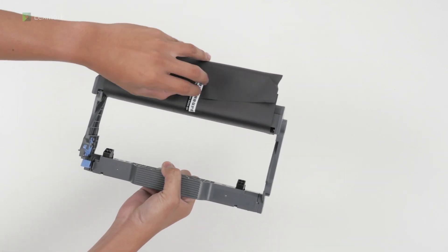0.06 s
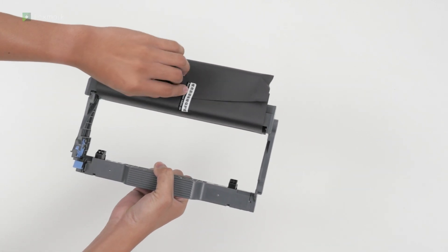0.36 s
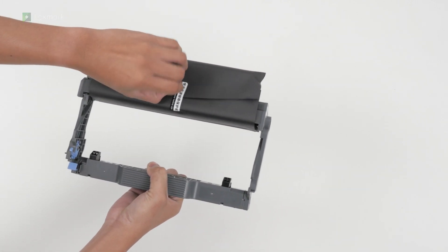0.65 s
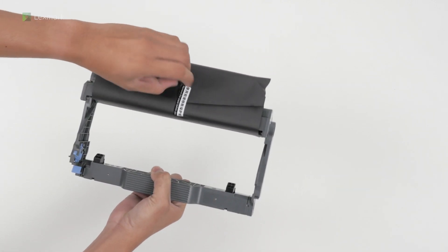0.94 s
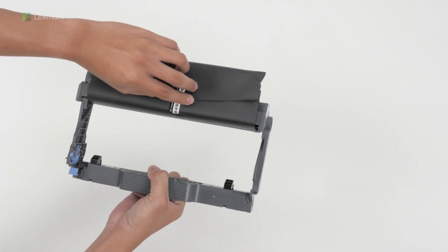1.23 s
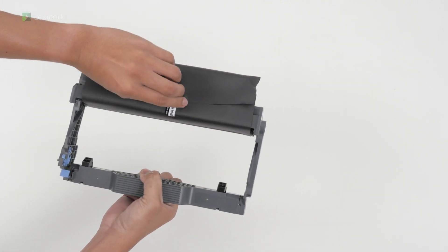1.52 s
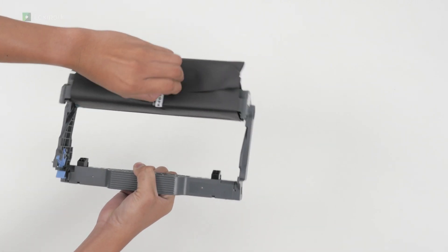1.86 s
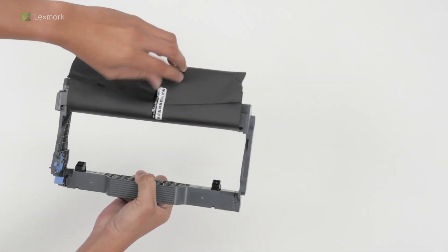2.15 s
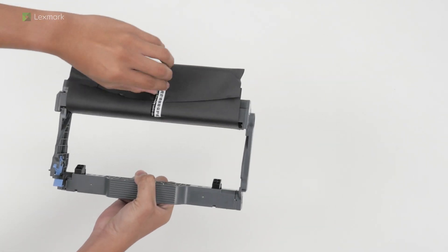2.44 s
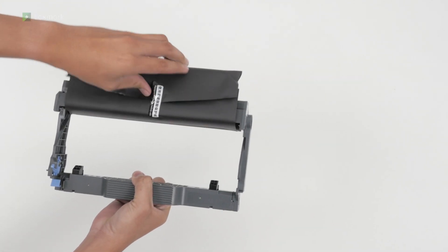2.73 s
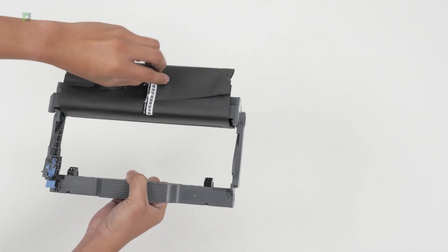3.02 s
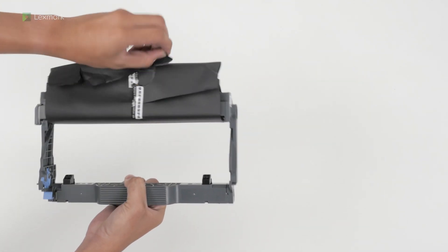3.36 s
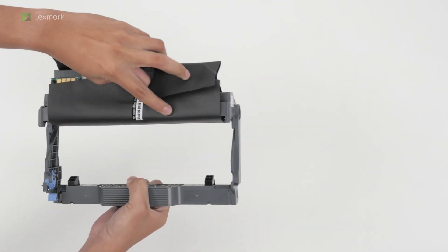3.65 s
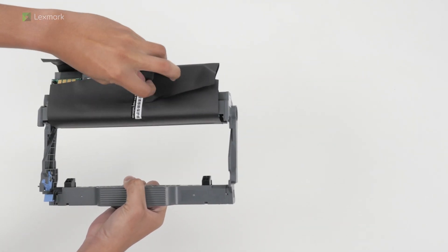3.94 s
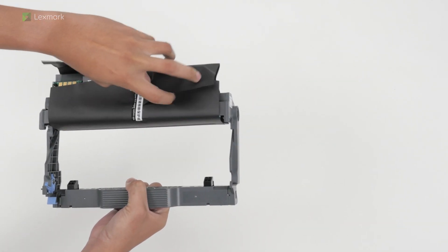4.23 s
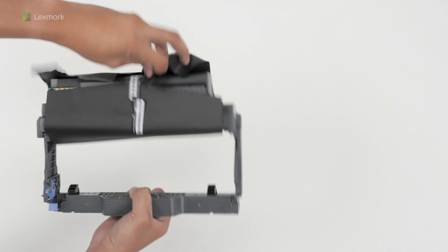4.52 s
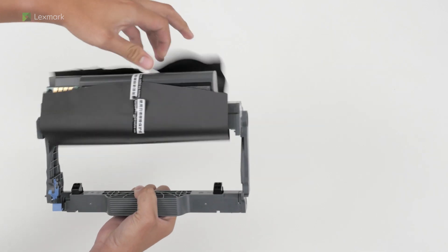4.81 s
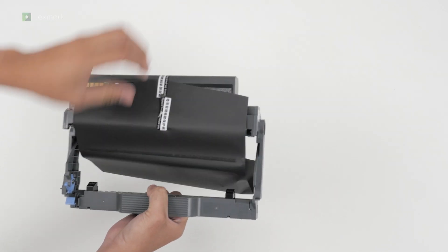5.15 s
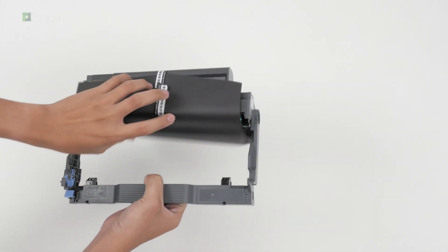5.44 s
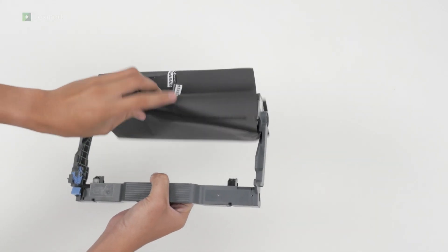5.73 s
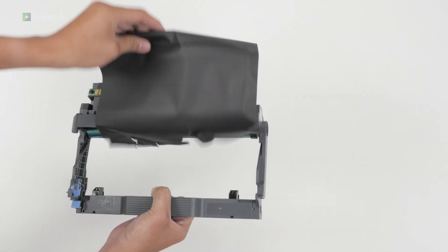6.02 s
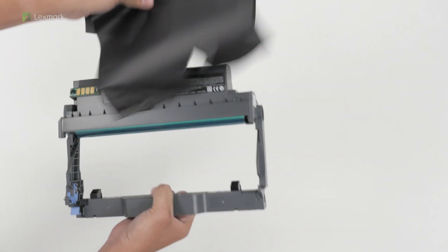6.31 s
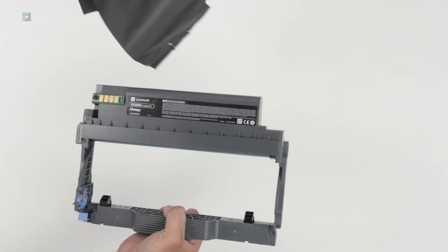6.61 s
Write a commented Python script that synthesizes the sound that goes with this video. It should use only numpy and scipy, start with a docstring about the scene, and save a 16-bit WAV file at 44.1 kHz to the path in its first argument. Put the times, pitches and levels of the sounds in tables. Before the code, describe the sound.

Fingers rub and tug at a plastic wrapper on a printer part, making short scratchy rustles and sharp crinkles. Longer pulls follow, with the sheet scraping and flapping as it slides. Near the end it jerks free and the hollow plastic frame gives one loud, briefly ringing clack, followed by a fading rustle. The sound is close, in a small quiet room with a soft ventilation rumble.

```python
"""Peeling a plastic wrapper off a printer part

Close up in a small, quiet room, fingers rub and pull the sheet in stick-slip friction. Its creases
snap and its panels buckle and flap; at last it jerks free and the hollow plastic frame clacks loudly.
The walls answer briefly over a soft ventilation rumble."""
import sys
import numpy as np
from scipy import signal
from scipy.fft import rfft, irfft, next_fast_len
from scipy.io import wavfile
from scipy.ndimage import uniform_filter1d, map_coordinates

SR = 44100
rng = np.random.default_rng(int(sys.argv[2]) if len(sys.argv) > 2 else 0)


def output_pcm(signal):
    """Save a mono or channel-first signal as 16-bit PCM at the path in sys.argv[1].

    Samples are clipped to [-1, 1] before scaling.
    """
    pcm = np.clip(np.atleast_2d(signal).T, -1, 1) * 32767
    wavfile.write(sys.argv[1], SR, np.round(pcm).astype(np.int16))


N = 298557


def amp(db):
    """dB to gain."""
    return 10 ** (np.asarray(db) / 20)


def unit(x):
    """x at rms 1."""
    return x / np.sqrt(np.mean(x ** 2) + 1e-20)


def along(points, hz):
    """Interpolate (f/Hz, value) points over log frequency."""
    f, v = np.transpose(points)
    return np.interp(np.log(hz + 1), np.log(f), v)


def wobble(rate_hz):
    """Smooth random curve with knots at rate_hz."""
    knots = rng.standard_normal(int(N * rate_hz / SR) + 4)
    return map_coordinates(knots, [np.arange(N) * rate_hz / SR])


def filtered(x, response):
    """Apply a complex frequency response."""
    n = x.shape[-1]
    m = next_fast_len(n + SR // 4)
    return irfft(rfft(x, m) * response(np.fft.rfftfreq(m, 1 / SR)), m)[..., :n]


def coloured(x, spectrum):
    """x shaped by (f/Hz, level/dB) points, at rms 1."""
    return unit(filtered(x, lambda hz: amp(along(spectrum, hz))))


def band(x, lo_hz, hi_hz, order):
    """Causal band-pass."""
    return signal.sosfilt(signal.butter(order, [lo_hz, hi_hz], "band", fs=SR, output="sos"), x)


def add(track, start_s, x):
    """Mix x into track from start_s."""
    i = round(start_s * SR)
    track[i:i + len(x)] += x[:N - i]


def rubbing():
    """The sliding sheet: a hollow scrape tuned by the free panel's size, hiss, texture fizz, crinkles."""
    # f/Hz, level/dB
    hiss_spectrum = [(80, -71), (400, -43.5), (1200, -22.5), (2200, -2.5), (3200, 2.5), (4300, 0.5),
                     (6000, -4), (8000, -13.5), (12000, -36.5)]
    # f/Hz, level/dB
    fizz_spectrum = [(100, -78.5), (1500, -55), (4000, -30), (6500, -9), (8200, -10), (9800, -1.5),
                     (11500, -5.5), (12800, -14.5), (15000, -24.5), (16000, -27.5)]
    pressure = amp(2.6 * wobble(60))
    coarse = slips(rate_hz=760, spread_db=2.5, bed=0.86) * amp(3.07 * wobble(80)) * pressure
    hiss = coloured(slips(rate_hz=2500, spread_db=13.5, bed=0.94) * pressure, hiss_spectrum)
    fizz = coloured(slips(rate_hz=3500, spread_db=14, bed=1.6) * pressure, fizz_spectrum)
    edge = unit(band(slips(rate_hz=3100, spread_db=4, bed=0.93) * pressure, 12000, 14000, order=2))
    crinkle = unit(band(slips(rate_hz=240, spread_db=0.5, bed=0.059), 2000, 10500, order=4))
    rustle = amp(-4) * hiss + amp(-1) * fizz + amp(-8) * crinkle
    track = np.zeros(N)
    for i, hiss_gain, scrape_gain, hz in gestures():
        panel = band(coarse[i], hz / 1.35, hz * 1.35, order=1)
        rasp = unit(band(panel, 270, 4200, order=3))
        squeak = squeaks(len(i), hz, rate_hz=350, scatter=0.28, decay_cycles=8.6, spread_db=7)
        scrape = unit(rasp + amp(-2.5) * squeak)
        sharpness = amp(-7.5) * np.sqrt(hiss_gain / amp(-29.5))  # faster is brighter
        track[i] += scrape_gain * scrape + hiss_gain * (rustle[i] + sharpness * edge[i])
    return track


def gestures():
    """Short strokes and long pulls of the hand; yields (indices, hiss gain, scrape gain, scrape f/Hz)."""
    # peak t/s, length/s, hiss/dB, scrape/dB, scrape f/Hz
    strokes = [(0.082, 0.1, -55, -52.5, 1484), (0.166, .1, -55, -79, 1560), (0.296, 0.08, -53.5, -71, 1820),
               (0.445, .08, -67, -75, 910), (0.659, 0.022, -47, -57, 1760),
               (0.702, 0.071, -41, -47.5, 1750), (0.813, 0.081, -37, -42, 1640),
               (0.878, 0.084, -38.5, -60.5, 2070), (1.004, 0.15, -54.5, -52.5, 1814),
               (1.223, 0.12, -57, -60.5, 1485), (1.446, 0.1, -62, -74.5, 894),
               (1.537, 0.06, -55.5, -59, 1885), (1.635, 0.11, -56.5, -59, 1235),
               (1.74, 0.048, -41.5, -41.5, 1427), (1.79, 0.19, -45, -54, 1670),
               (2.002, .11, -45, -47.5, 1880), (2.108, 0.029, -53.5, -64, 1670),
               (2.26, 0.2, -60, -80, 1900), (2.36, 0.059, -58.5, -55, 1430),
               (2.427, 0.074, -53.5, -58.5, 1370), (2.608, 0.1, -48.5, -56.5, 1330),
               (2.77, 0.055, -43.5, -40, 1380), (2.915, 0.087, -34.5, -39.5, 1930),
               (3.026, 0.21, -46.5, -55.5, 1850), (3.649, 0.07, -48, -52, 2170),
               (3.719, 0.057, -68, -45.5, 1775), (3.791, 0.063, -75, -47.5, 1920),
               (3.851, 0.054, -55, -38, 1242), (3.882, 0.085, -37, -48, 1840),
               (4.038, .035, -37, -48.5, 2200), (4.14, 0.056, -56, -57.5, 1815),
               (4.303, 0.056, -57.5, -43, 2110), (4.53, 0.081, -32, -37.5, 1340),
               (4.802, 0.091, -44.5, -47, 1820), (4.924, 0.035, -45, -46.5, 1447),
               (5.455, 0.023, -69, -61.5, 1700), (5.534, 0.068, -47.5, -45, 1630),
               (5.604, 0.095, -56, -45.5, 1270), (5.848, 0.035, -44, -44, 1176),
               (6.179, 0.036, -47.5, -43.5, 1290), (6.392, 0.15, -42, -61.5, 1500),
               (6.604, 0.33, -65, -85, 1215)]
    # one curve per pull (tape peels, flap lifts, sheet slides off): t/s, hiss/dB, scrape/dB
    pulls = [
        [(3.135, -42, -55), (3.155, -38.5, -52), (3.235, -33.5, -41), (3.28, -33, -43.5), (3.335, -29, -37.5),
         (3.4, -53, -58), (3.47, -48.5, -59.5), (3.63, -55, -67)],
        [(4.19, -56, -76.5), (4.245, -48, -62), (4.44, -46.5, -46.5), (4.5, -47, -45.5), (4.64, -45.5, -40.5),
         (4.74, -52.5, -42), (4.83, -49, -44.5), (4.89, -65, -51.5), (5.06, -66.5, -64.5)],
        [(5.55, -67, -61), (5.64, -48, -58), (5.69, -48.5, -43.5), (5.8, -41.5, -46.5), (5.9, -41, -46),
         (5.95, -39, -39), (6.12, -44, -45), (6.25, -42.5, -44), (6.32, -54, -52)],
    ]
    rise_share, pull_hz = 0.45, 1744
    t = np.arange(N) / SR
    for peak_s, length_s, hiss_db, scrape_db, hz in strokes:
        i = np.flatnonzero(np.abs(t - peak_s) < 0.25)
        width_s = length_s * np.where(t[i] < peak_s, rise_share, 1 - rise_share)
        speed = np.exp(-((t[i] - peak_s) / width_s) ** 2)
        yield i, speed * amp(hiss_db), speed * amp(scrape_db), hz
    for pull in pulls:
        times_s, hiss_db, scrape_db = np.transpose(pull)
        i = np.flatnonzero((t > times_s[0]) & (t < times_s[-1]))
        yield i, amp(np.interp(t[i], times_s, hiss_db)), amp(np.interp(t[i], times_s, scrape_db)), pull_hz


def slips(rate_hz, spread_db, bed):
    """Tiny stick-slip releases of uneven size on a bed of smooth friction."""
    released = rng.random(N) < rate_hz / SR
    size = amp(spread_db * np.clip(rng.standard_normal(N), -2, 2))
    impulses = unit(released * size * rng.choice([-1, 1], N))
    return unit(impulses + bed * rng.standard_normal(N))


def squeaks(n, hz, rate_hz, scatter, decay_cycles, spread_db):
    """Each slip briefly rings a patch of sheet; patches differ in size, so in pitch."""
    count = max(int(rate_hz * n / SR), 1)
    pitch, size = np.clip(rng.standard_normal((count, 2)), -2, 2).T[:, :, None]
    start, age = rng.integers(n, size=(count, 1)), np.arange(SR // 40)
    cycles = hz * np.exp(scatter * pitch) * age / SR
    envelope = np.exp(-cycles / decay_cycles) * (1 - np.exp(-cycles))
    grains = amp(spread_db * size) * np.sin(2 * np.pi * cycles) * envelope
    return unit(np.bincount((start + age).ravel(), grains.ravel(), n)[:n])


def crease_snaps():
    """Creases snap through sharply; the low body grows more slowly than the crack."""
    # t/s, crack/dB, treble re crack/dB, crack f/Hz
    snaps = [(0.66, -34, 6.5, 3170), (0.6654, -33.5, 3, 2980), (0.69, -35.5, 4, 3700),
             (0.7011, -23.5, -15, 2900), (0.7767, -33, 3, 3300), (.7866, -34.5, 11.5, 3100),
             (.7959, -33.5, 12.5, 3500), (0.806, -28.5, 7, 3580), (0.82, -26, -5, 3900),
             (0.8676, -11, -4.5, 2560), (0.8725, -32, 4, 2990), (0.8809, -25, -2, 3170),
             (0.9345, -32, -6, 5470), (1.0475, -39, 0.5, 2100), (1.5182, -29, -20, 2580),
             (1.6213, -28, 5, 4260), (1.6775, -30, -2.5, 2880), (1.7188, -22.5, -3.5, 4600),
             (1.7228, -20, -4.5, 3960), (1.859, -30.5, -10, 3300), (1.9971, -31.5, -9, 2400),
             (2.3491, -38, -30, 2700), (2.762, -26, 6, 3750), (2.7717, -21.5, 5, 4400),
             (2.8786, -15, -5.5, 3930), (2.9563, -23.5, -16, 2970), (3.0526, -19, -11, 4270),
             (3.6318, -32, -11, 2400), (3.859, -27, -4, 1700), (3.8846, -13.5, 0, 3480),
             (4.0973, -38.5, -40, 1990), (4.319, -27.5, -6, 4130), (4.354, -34, -1, 4500),
             (4.3841, -21.5, -1, 3780), (4.802, -32.5, 5, 3110), (5.4843, -44, -8, 2900),
             (5.5143, -30, 1, 6240), (5.7866, -32.5, 7, 4400), (6.0567, -24, 8, 3500)]
    events = [(s, hz, [-46.5 + 0.67 * (db + 33), db, db + treble_db]) for s, db, treble_db, hz in snaps]
    return pops(events, trim_db=[0.6, 1, 0.6], rise_ms=0.048, crack_ms=0.98, flutter_db=-19.5,
                flutter_ms=4, body_lo_hz=720, body_ms=9.8, band_ratio=1.35, crack_lo_hz=1730)


def panel_flaps():
    """Whole panels buckle with a softer crack; more body brings more treble."""
    # t/s, crack/dB, body re crack/dB
    flaps = [(1.61, -49.5, 5), (1.7373, -38.5, -6), (2.039, -35, -7.5), (2.7506, -33.5, -20),
             (2.7734, -38, 3), (3.7065, -38, -37), (3.8914, -28.5, -8), (4.283, -42, -31),
             (4.303, -43.5, -13), (4.48, -34.5, -17), (4.5035, -23, -1), (4.5246, -25.5, -4.5),
             (4.5579, -25.5, -4), (4.733, -40, 6.5), (4.756, -35, -1), (4.7987, -34.5, -10),
             (4.9061, -32.5, 0.5), (5.5882, -31.5, -1), (5.6659, -23.5, -10), (5.702, -34, 0.5),
             (5.7224, -36, 1.5), (5.9248, -33, -2.5), (6.0267, -41, 0), (6.0563, -26, -1.5),
             (6.1499, -25.5, -4.5), (6.2447, -32, -0.5), (6.314, -37, -1)]
    crack_hz = 1920
    events = [(s, crack_hz, [db + body_db, db, db - 3.5 + 0.4 * body_db]) for s, db, body_db in flaps]
    return pops(events, trim_db=[-1.5, 0.4, -1.5], rise_ms=0.71, crack_ms=4.9, flutter_db=-15,
                flutter_ms=4.2, body_lo_hz=420, body_ms=15, band_ratio=1.36, crack_lo_hz=1000)


def pops(events, trim_db, rise_ms, crack_ms, flutter_db, flutter_ms,
         body_lo_hz, body_ms, band_ratio, crack_lo_hz):
    """Each release cracks, then the sheet flutters; low bending waves last longest."""
    track, t_ms = np.zeros(N), np.arange(SR // 20) * 1000 / SR
    decay = np.exp(-t_ms / crack_ms)
    envelope = (decay + amp(flutter_db) * np.exp(-t_ms / flutter_ms)) * (1 - np.exp(-t_ms / rise_ms))
    for start_s, hz, levels_db in events:
        noise = rng.choice([-1., 1.], (3, len(t_ms)))
        body = band(noise[0] * np.exp(-t_ms / body_ms), body_lo_hz, 1400, order=3)
        crack = band(noise[1] * envelope, hz / band_ratio, hz * band_ratio, order=1)
        crack = band(crack, crack_lo_hz, 14000, order=3)
        treble = band(noise[2] * envelope, 8030, 12130, order=2)
        gains = amp(levels_db) * amp(trim_db) * np.sqrt(2 * np.mean(decay ** 2))
        add(track, start_s, sum(gain * unit(part) for gain, part in zip(gains, (body, crack, treble))))
    return track


def frame_jolts():
    """As the sheet lets go, loose parts chatter and ring; the shell knocks and gives a low push of air."""
    # t/s, clatter/dB, knock/dB, ring/dB, push/dB, chatter length/s
    jolts = [(2.772, -40, -50, -89, -72, 0.024), (3.885, -42, -37, -72, -63, 0.02),
             (4.504, -36, -37, -85.5, -65.5, 0.075), (6.3233, -11.5, -33.5, -38, -42.5, 0.013)]
    # f/Hz, level/dB, t60/s
    ring_modes = [(2550, -9, .2), (3200, 0.5, 0.24), (3470, 1, 0.21), (3714, -4, 0.23), (9200, -10, .3),
                  (9200, -1, .3), (10200, 16.5, 0.15), (10110, -13, .26), (10800, -4.5, .25),
                  (11500, -5, .22)]
    # f/Hz, level/dB
    clatter_spectrum = [(100, -42), (250, -21.5), (420, -10), (660, -29), (810, 1.5), (1150, -8.5),
                        (1750, -1.5), (2600, -5), (3500, -3.5), (6500, -5), (9400, 2), (11500, 0.5),
                        (14500, -8), (16000, -19.5)]
    track, t = np.zeros(N), np.arange(SR // 2) / SR
    contacts = coloured(slips(rate_hz=2500, spread_db=6, bed=1), clatter_spectrum)
    push_s = 0.0028
    push = (1 - t / push_s) * np.exp(-t / push_s)
    for start_s, clatter_db, knock_db, ring_db, push_db, chatter_s in jolts:
        envelope = amp(-4 * t / chatter_s - 540 * np.maximum(t - chatter_s, 0))
        ring = sum(amp(db - 60 * t / t60_s) * np.sin(2 * np.pi * (hz * t + rng.random()))
                   for hz, db, t60_s in ring_modes)
        clatter = np.roll(contacts, rng.integers(N))[:len(t)] * envelope
        knock = unit(shell(rng.standard_normal(len(t)) * envelope)) * np.sqrt(np.mean(envelope ** 2))
        jolt = amp(clatter_db) * clatter + amp(ring_db) * ring + amp(knock_db) * knock
        add(track, start_s, jolt + amp(push_db) * push)
    return track


def shell(force):
    """The hollow frame resonates under a force, its modes alternating in sign."""
    # f/Hz, bandwidth/Hz, level/dB
    modes = [(228, 39, -11.5), (326, 55, -7), (384, 33, 2.5), (480, 67, 3.5), (580, 39, 6.5),
             (760, 35, 2.5), (1020, 40, 0.5)]
    return filtered(force, lambda f: sum((-1) ** k * amp(db) / (1 + 1j * (f - hz ** 2 / (f + 1e-9)) / bw_hz)
                                         for k, (hz, bw_hz, db) in enumerate(modes)))


def frame_hum(rub):
    """The dragging sheet makes the frame hum with the effort."""
    effort = np.sqrt(np.abs(uniform_filter1d(rub ** 2, SR // 100)))
    return effort * unit(shell(rng.standard_normal(N)))


def room(x, early_db, tail_db):
    """The table top reflects within milliseconds, the walls later; paths change as the hands move."""
    # f/Hz, t60/s
    wall_decay = [(150, 0.1), (500, 0.28), (1200, .28), (3500, 0.35), (7000, 0.36), (11000, 0.29),
                  (13000, 0.27), (16000, 0.34)]
    wet, hop = np.zeros((2, N)), SR // 3
    for i in range(-hop, N, hop):  # crossfaded random responses
        start, end = max(i, 0), min(i + 2 * hop, N)
        piece = x[start:end] * np.sin(np.pi * (np.arange(start, end) - i) / (2 * hop))
        hz, t, spectra = signal.stft(rng.standard_normal((2, SR // 2)), SR, nperseg=256)
        decay = amp(-60 * t / along(wall_decay, hz)[:, None])
        tail = signal.istft(spectra * decay, SR, nperseg=256)[1]
        t = np.arange(tail.shape[1]) / SR
        tail *= 1 - np.exp(-(t / 0.006) ** 2)
        early = rng.standard_normal(tail.shape) * t * np.exp(-t / 0.002)
        tail *= amp(tail_db) / np.linalg.norm(tail[0])
        early *= amp(early_db) / np.linalg.norm(early[0])
        for channel, response in zip(wet, early + tail):
            add(channel, start / SR, signal.fftconvolve(piece, response))
    return diffuse(wet)


def diffuse(pair):
    """Two unrelated signals as sound from all round: narrow in the bass, wide above."""
    # f/Hz, side re mid/dB
    width = [(60, -14.5), (250, -26), (550, -9.5), (1100, 1.5), (3000, 0), (6000, 0), (9500, -3),
             (15000, -4.5)]
    side = filtered(pair[1], lambda hz: amp(along(width, hz)))
    return np.array([pair[0] + side, pair[0] - side])


def ventilation():
    """Low, steady rumble with faint hiss."""
    # f/Hz, level/dB
    air_spectrum = [(20, -26), (60, -21.5), (100, -10.5), (130, -3.5), (200, -3.5), (280, 3), (370, -4.5),
                    (550, -10.5), (900, -20), (1600, -23.5), (3000, -23.5), (6000, -32.5), (10000, -28),
                    (13000, -30), (16000, -32)]
    return amp(-65 + 0.57 * wobble(18)) * diffuse(coloured(rng.standard_normal((2, N)), air_spectrum))


def scene():
    """Sheet and frame in the room, slightly left, over the ventilation."""
    # f/Hz, left re right/dB
    balance = [(400, .3), (1200, 2.5), (2500, 1.3), (8000, .9), (13000, .2)]
    rub = rubbing()
    sheet = rub + crease_snaps() + panel_flaps()
    direct = sheet + amp(-9) * shell(sheet) + amp(-27) * frame_hum(rub) + frame_jolts()
    heard = direct + room(direct, early_db=-7.5, tail_db=-8)
    panned = filtered(heard, lambda hz: amp(np.outer([0.5, -0.5], along(balance, hz))))
    return panned + ventilation()


def record(dry):
    """Soft peak limiter, then a steep low-pass."""
    ceiling, cutoff_hz = 0.92, 15800
    rounded = dry / (1 + np.abs(dry / ceiling) ** 12) ** (1 / 12)
    return filtered(rounded, lambda hz: 1 / np.sqrt(1 + (hz / cutoff_hz) ** 120))


dry = scene()
out = record(dry)
output_pcm(out)
```